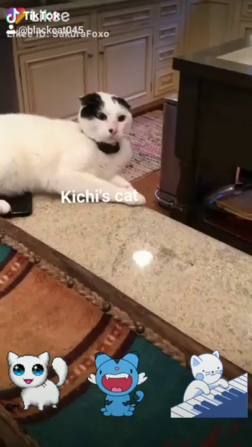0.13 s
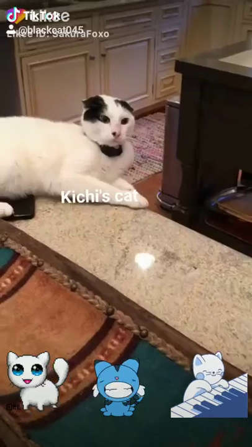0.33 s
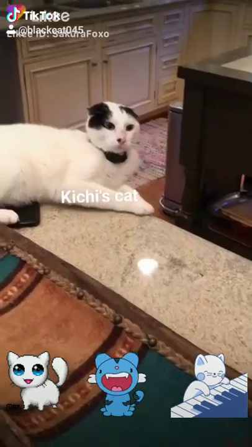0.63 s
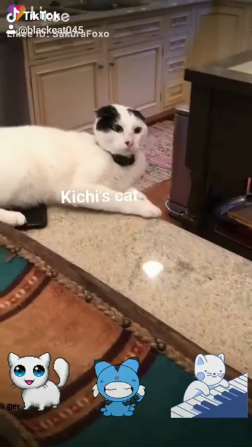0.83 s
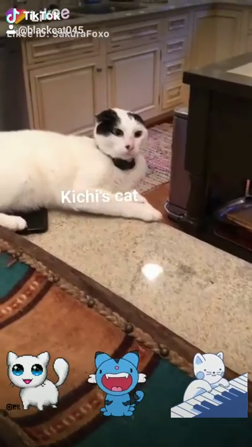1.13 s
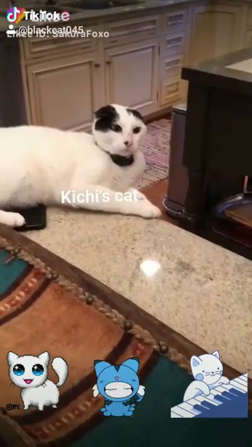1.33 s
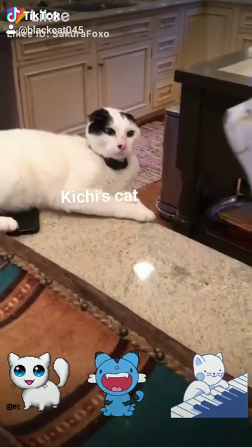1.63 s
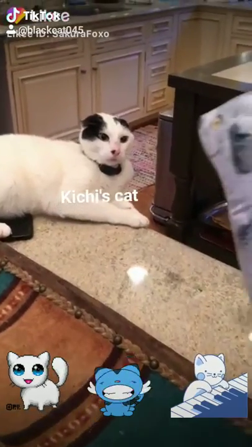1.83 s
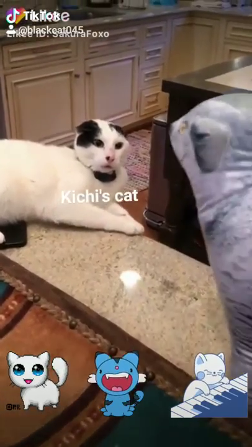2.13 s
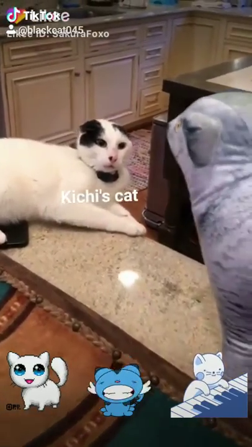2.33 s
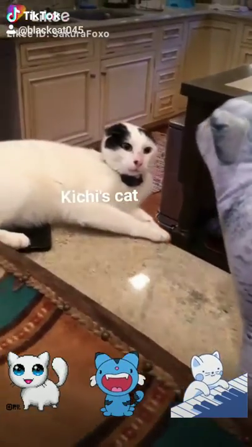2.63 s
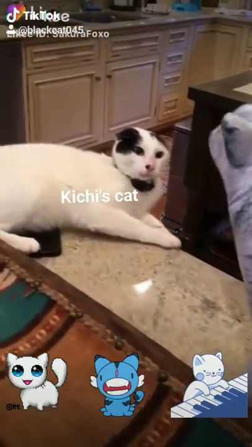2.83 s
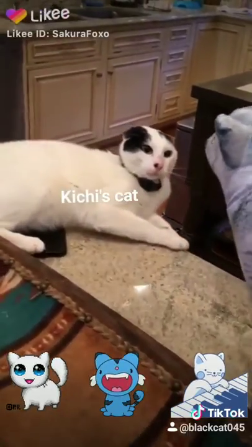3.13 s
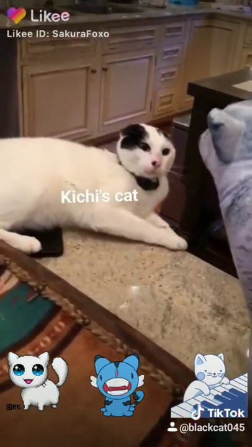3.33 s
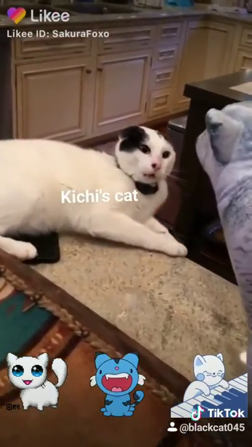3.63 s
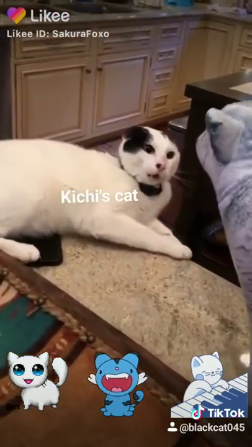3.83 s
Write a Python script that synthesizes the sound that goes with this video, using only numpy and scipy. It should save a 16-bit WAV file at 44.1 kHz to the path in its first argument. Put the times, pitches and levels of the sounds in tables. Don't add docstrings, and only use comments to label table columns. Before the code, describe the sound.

A cat starts a low closed-mouth moan after a quiet stretch of room hum, soft fabric rubbing and dull ticks, then climbs into an open yowl, close microphone in a hard-walled kitchen.

```python
import sys
import numpy as np
from scipy import signal
from scipy.fft import rfft, irfft, next_fast_len
from scipy.io import wavfile
from scipy.ndimage import uniform_filter1d, map_coordinates

SR = 44100
rng = np.random.default_rng(int(sys.argv[2]) if len(sys.argv) > 2 else 0)


def wav_record(signal):
    frames = np.transpose(np.atleast_2d(signal))
    bounded = np.clip(frames, -1, 1)
    quanta = np.round(bounded * 32767).astype(np.int16)
    wavfile.write(sys.argv[1], SR, quanta)


def ratio(d):
    e = np.asarray(d, float) / 20
    return 10 ** e


N = 176400
T = np.arange(N) / SR

# (frequency [Hz], level [dB rms])
HUM_LINES = [(120.1, -60), (240, -57.5), (360, -66.5), (402.7, -74), (686, -77.5), (810, -73.5)]
# (frequency [Hz], width [Hz], level [dB])
ROOM_MODES = [(47.8, 29, 0), (67.5, 16, 4), (158.1, 43, -0.5), (210.7, 24, -1), (318, 64, -7.5)]
# (frequency [Hz], density [dB per Hz])
AIR_SPECTRUM = [(30, -33), (100, 1.5), (400, -5.5), (1100, -17), (3600, -19.5), (5200, -33), (13000, -43)]
# (frequency [Hz], width [Hz], gain [dB])
DUCT_BANDS = [(816, 160, 2.5), (1610, 300, 2.5), (2530, 840, 4), (4290, 480, 3.5)]
# (start [s], length [s], level [dB])
RUBS = [
    (.4, 0.8, -67),
    (1.19, .63, -73),
    (1.87, 0.32, -71),
    (2.2, 0.51, -73),
    (2.75, 0.047, -72),
    (3.07, .12, -73),
    (3.2, .9, -74),
]
# (frequency [Hz], density [dB per Hz])
CLOTH_SPECTRUM = [(1000, -26), (3000, 0), (6000, 0), (9000, -3.5), (13000, -8)]
# (start [s], length [s], level [dB])
SQUEEZES = [
    (1.52, 0.24, -65.5),
    (1.88, 0.27, -62),
    (2.01, 0.024, -65),
    (2.055, .05, -64.5),
]
# (frequency [Hz], density [dB per Hz])
PLUSH_SPECTRUM = [(700, -25), (1500, 6.5), (2500, 6.5), (3500, -1), (7000, -26)]
# (time [s], peak level [dB], frequency [Hz])
TICKS = [
    (1.887, -40, 1820),
    (1.98, -44, 2630),
    (2.02, -41, 1970),
    (2.058, -38, 1570),
    (2.118, -44, 2190),
    (2.33, -40, 1370),
    (2.393, -38, 2030),
    (2.487, -36.5, 1250),
]
# (frequency [Hz], T60 [s])
KITCHEN_T60 = [(200, 0.26), (1500, 0.5), (9000, 0.24)]
# (frequency [Hz], gain [dB])
ECHO_COLOUR = [(300, -3), (1500, 0), (6000, 1.5)]
# (time [s], pitch [Hz], effort [dB], mouth opening [0-1])
MOAN = [
    (2.575, 128.1, -54, 0.04),
    (2.62, 140.3, -47, 0),
    (2.67, 179.7, -41.5, 0),
    (2.75, 192.5, -49, 0.01),
    (2.8, 216.3, -49.5, 0.06),
    (2.9, 253.5, -49, 0.14),
    (3.0, 285.7, -44.5, 0),
    (3.12, 312.5, -50.5, 0.14),
    (3.235, 314.5, -45, 0.24),
]
# (time [s], pitch [Hz], effort [dB], mouth opening [0-1])
YOWL = [
    (3.33, 385.8, -45.5, 0.31),
    (3.42, 467, -51, 0.53),
    (3.502, 512.3, -50, 0.64),
    (3.58, 541.2, -47.5, 0.67),
    (3.71, 572.6, -46, 0.78),
    (3.83, 583, -46, 0.94),
    (3.871, 614, -46, 0.86),
    (3.93, 638.4, -44, 1),
    (4.0, 639, -43.5, 0.97),
]
# (closed [Hz], open [Hz], width [Hz], gain at each of the four openings [dB])
THROAT = [(650, 632, 226, -13.5, 4.5, -8, -17), (966, 1200, 374, -48, -51, -8, 15.5),
          (1900, 2400, 564, -49, -30, 2.5, 2.5), (3200, 3350, 1280, -50, -51, -33, -10),
          (3092, 4587, 400, -53, -28.5, 4, -14), (4850, 5780, 770, -70, -57, -21, -15.5),
          (7940, 8100, 350, -80, -67, -40, -26), (9000, 9100, 800, -80, -70, -50, -26)]
OPENINGS = [0, .15, .5, 1]
FOLDS_DB = [-0.91, -2, -37.5]
# (time [s], gain [dB])
LEAD_IN = [(.374, -62), (.42, -52), (.429, -28)]


def unit(x):
    return x / np.sqrt(np.mean(x ** 2) + 1e-20)


def along(points, hz):
    f, v = np.transpose(points)
    return np.interp(np.log(hz + 1), np.log(f + 1), v)


def curves(rows):
    s, *cols = np.transpose(rows)
    return [uniform_filter1d(np.interp(T, s, c), size=1200, mode="nearest") for c in cols]


def wobble(rate_hz):
    knots = rng.standard_normal(int(N * rate_hz / SR) + 40)
    return map_coordinates(knots, [np.arange(N) * rate_hz / SR])


def peak(f, hz, width_hz):
    return 1j * f * width_hz / (hz * hz - f * f + 1j * f * width_hz)


def noise(gain):
    m = next_fast_len(N + 8192)
    spectrum = rfft(rng.standard_normal(m)) * gain(np.fft.rfftfreq(m, 1 / SR))
    return unit(irfft(spectrum, m)[:N])


def patchy(x):
    patch_db = 1.5
    z = signal.stft(x, nperseg=512)[2]
    field = uniform_filter1d(rng.standard_normal(z.shape), size=6, axis=0)
    field = uniform_filter1d(field, size=10, axis=1)
    return unit(signal.istft(z * ratio(patch_db * unit(field)), nperseg=512)[1][:N])


def strokes(rows):
    edge_s = 0.0088

    def step(s):
        return 0.5 + 0.5 * np.tanh((T - s) / edge_s)
    return sum(ratio(db) * (step(s) - step(s + length_s)) for s, length_s, db in rows)


def fridge_hum():
    hum = np.zeros(N)
    for hz, db in HUM_LINES:
        level = ratio(db + 1.45 * wobble(3.97)) * np.sqrt(2)
        hum += level * np.sin(2 * np.pi * hz * T + 0.5 * wobble(3.09))
    return hum


def room_rumble():
    rumble = noise(lambda f: np.sqrt(sum(ratio(2 * db) * abs(peak(f, c, w)) ** 4 for c, w, db in ROOM_MODES)))
    return ratio(-49.5 + 0.9 * wobble(5.96)) * rumble


def air_noise():
    def gain(f):
        ducts_db = sum(db * abs(peak(f, c, w)) ** 2 for c, w, db in DUCT_BANDS)
        return ratio(along(AIR_SPECTRUM, f) + ducts_db)
    return ratio(-54 + 0.6 * wobble(5.32)) * patchy(noise(gain))


def plush_rustle():
    hiss = patchy(noise(lambda f: ratio(along(CLOTH_SPECTRUM, f))))
    rustle = noise(lambda f: ratio(along(PLUSH_SPECTRUM, f)))
    rubs = strokes(RUBS) * ratio(1.1 * wobble(24.1)) * hiss
    return rubs + strokes(SQUEEZES) * ratio(2.5 * wobble(70)) * rustle


def toy_ticks():
    t60_s, level_db, attack_s = 0.0087, -2.5, 0.0004
    out = np.zeros(N)
    t = T[:2000]
    for s, db, hz in TICKS:
        click = sum(g * np.sin(2 * np.pi * r * hz * t) for r, g in ((1, 1), (1.73, 0.56), (2.2, 0.18)))
        envelope = ratio(db + level_db - 60 * t / t60_s) * (1 - np.exp(-t / attack_s))
        out[round(s * SR):][:len(t)] += envelope * click
    return out


def kitchen_echo(x):
    hz, t, z = signal.stft(rng.standard_normal(SR // 2), SR, nperseg=256)
    decay_db = along(ECHO_COLOUR, hz)[:, None] - 60 * t / along(KITCHEN_T60, hz)[:, None]
    tail = signal.istft(z * ratio(decay_db), SR, nperseg=256)[1]
    delayed = np.pad(x, (200, 0))
    return signal.fftconvolve(delayed, tail / np.linalg.norm(tail))[:N]


def cat():
    jitter, shimmer_db, breath_db = 0.0036, 1.17, -33
    unsteady_hz = 2500
    a = int(2.4 * SR)
    pitch_hz, effort_db, mouth = (c[a:] for c in curves(MOAN + YOWL))
    pitch_hz = pitch_hz * (1 + jitter * wobble(45) + 0.55 * jitter * wobble(200))[a:]
    phase = 2 * np.pi * np.cumsum(pitch_hz) / SR
    gains = [ratio(np.interp(mouth, OPENINGS, dbs)) for _, _, _, *dbs in THROAT]
    voice = np.zeros(N - a)
    for k in range(1, 18):
        f = k * pitch_hz
        tract = np.zeros(N - a)
        for g, (closed_hz, open_hz, width_hz, *_) in zip(gains, THROAT):
            tract += g * abs(peak(f, closed_hz + mouth * (open_hz - closed_hz), width_hz)) ** 3
        if k <= len(FOLDS_DB):
            tract += ratio(FOLDS_DB[k - 1])
        loose = 1 + f / unsteady_hz
        shimmer = ratio(shimmer_db * loose * wobble(38)[a:])
        breath = ratio(breath_db) * loose ** 2 * wobble(350)[a:]
        voice += np.sqrt(2) * (shimmer + breath) * tract * np.cos(k * phase - k * k)
    onset = np.clip((T[a:] - MOAN[0][0] + 0.03) / 0.05, 0, 1)
    return np.pad(voice * ratio(effort_db) * onset, (a, 0))


def scene():
    room = fridge_hum() + room_rumble() + air_noise()
    toy = plush_rustle() + toy_ticks()
    voice = cat()
    return (room + toy + ratio(-3) * kitchen_echo(voice) + voice)[None]


def top_cut(x):
    return signal.sosfilt(signal.butter(12, 13200, fs=SR, output="sos"), x)


def record(dry):
    start_s, rise_s, fade_s = 0.43, 0.0012, 0.0017
    s, db = np.transpose(LEAD_IN)
    smear = ratio(np.interp(T, s, db, left=-200))
    gate = np.maximum(smear, np.clip((T - start_s) / rise_s, 0, 1))
    fade = np.clip((T[-1] - T) / fade_s, 0, 1)
    return top_cut(dry * gate * fade)


dry = scene()
out = record(dry)
wav_record(out)
```